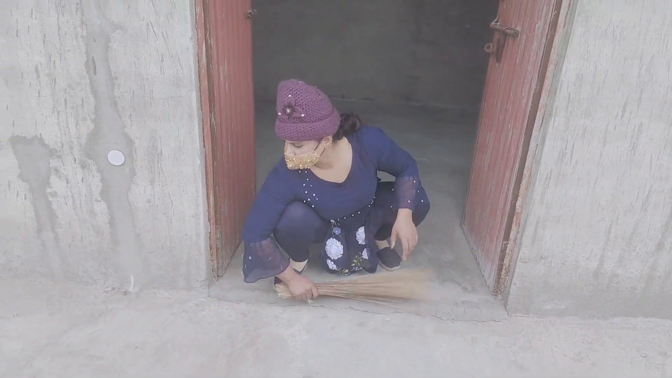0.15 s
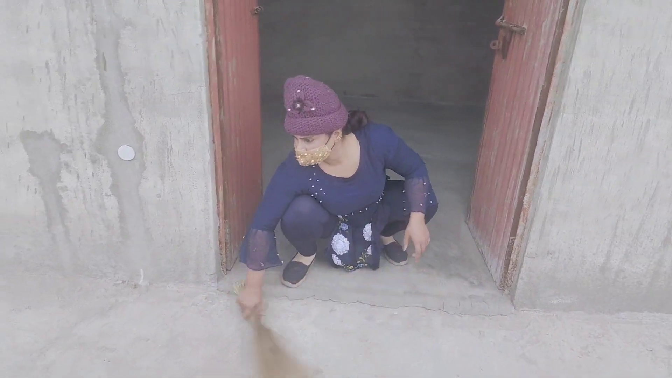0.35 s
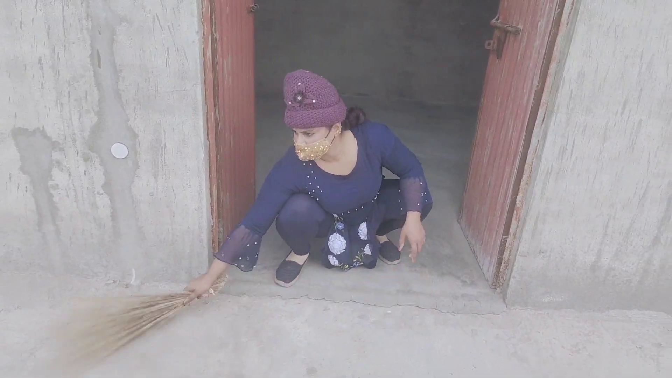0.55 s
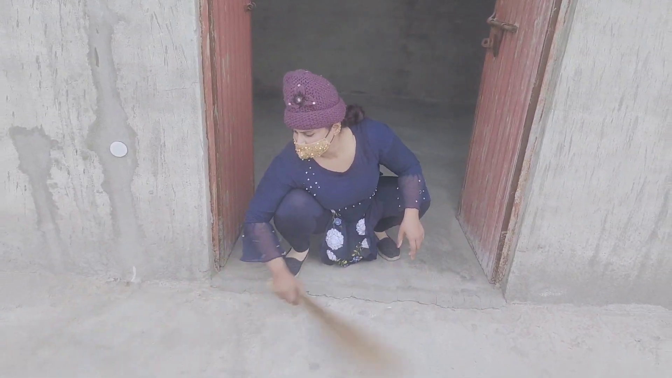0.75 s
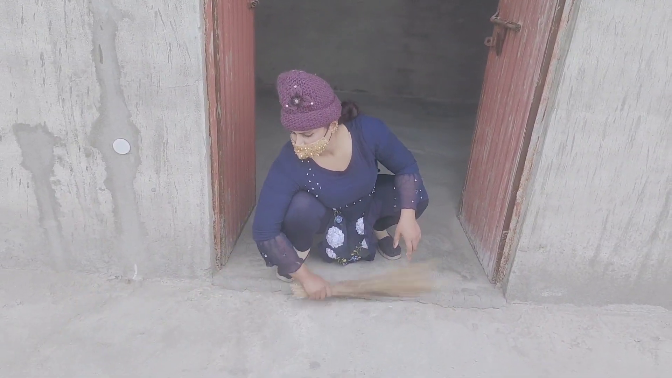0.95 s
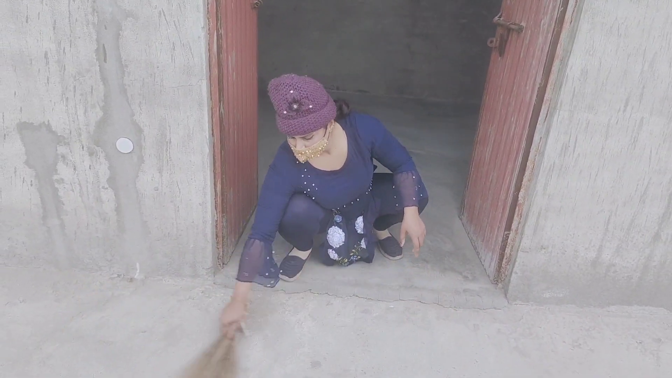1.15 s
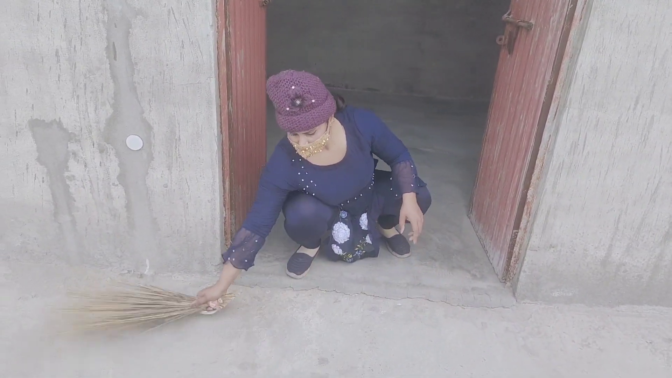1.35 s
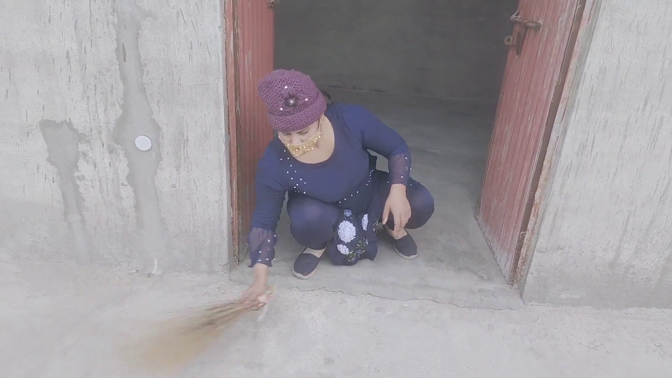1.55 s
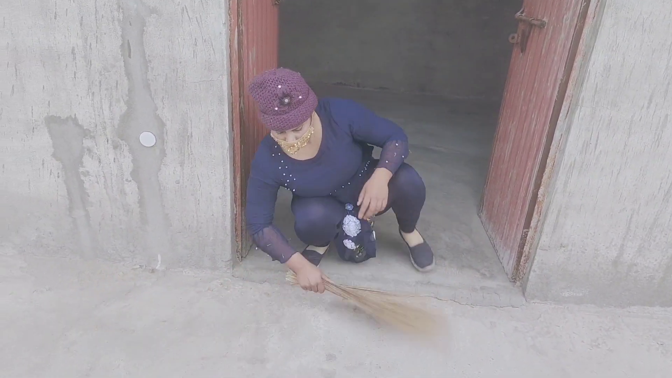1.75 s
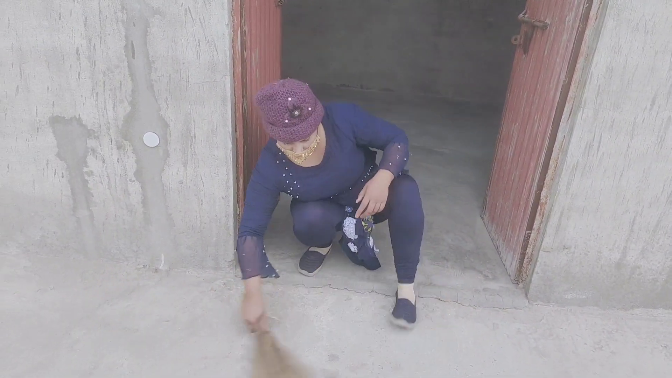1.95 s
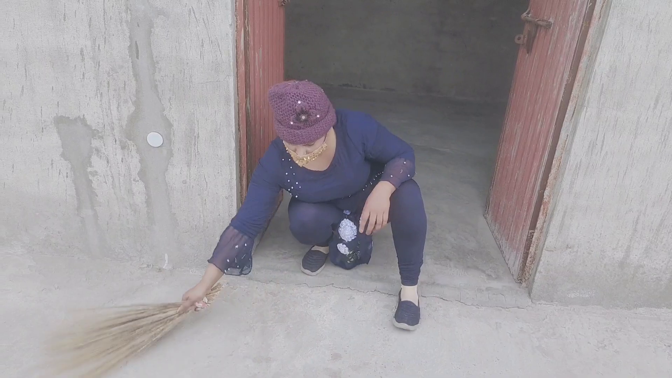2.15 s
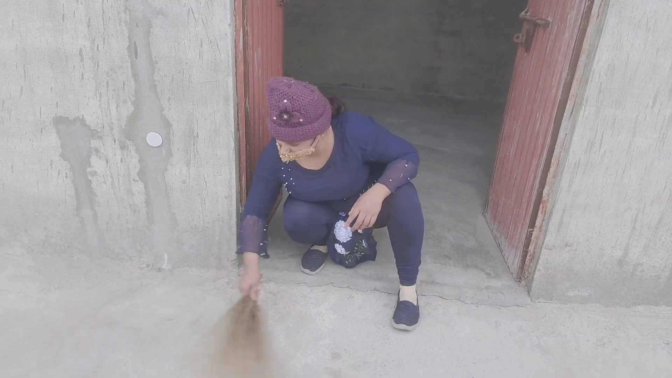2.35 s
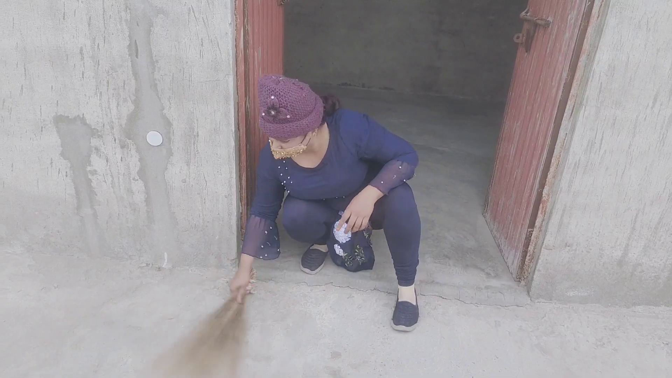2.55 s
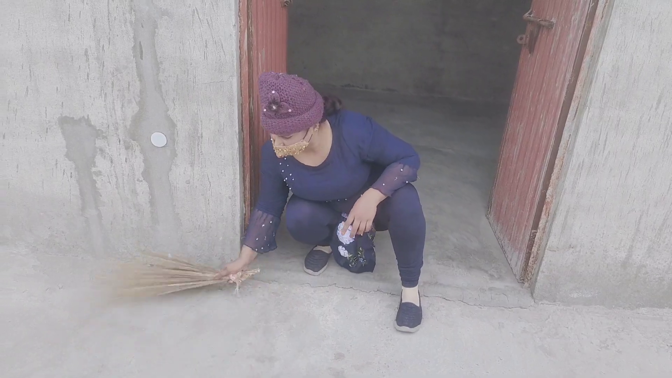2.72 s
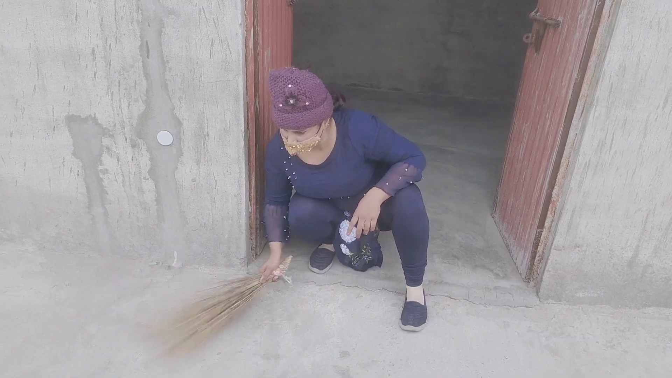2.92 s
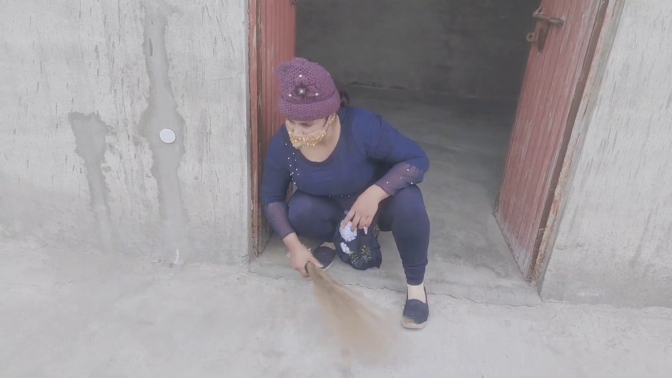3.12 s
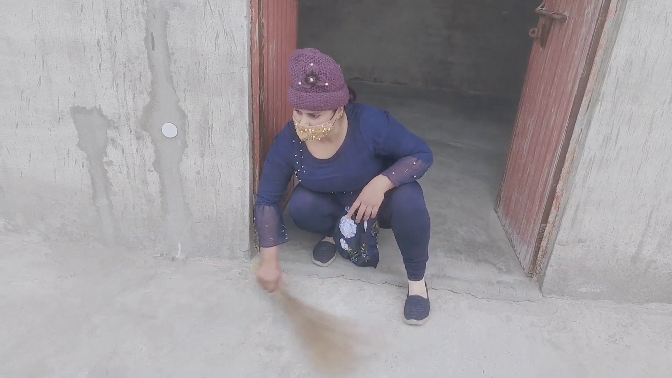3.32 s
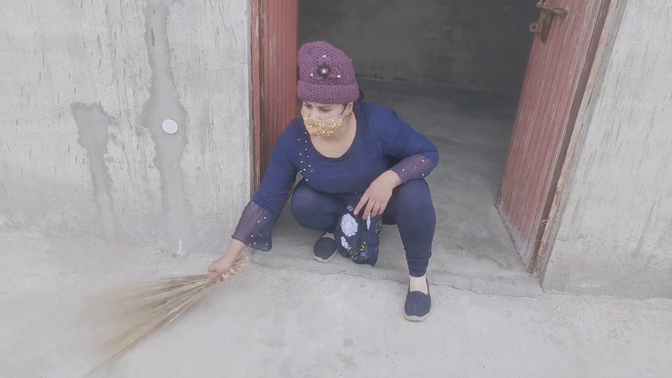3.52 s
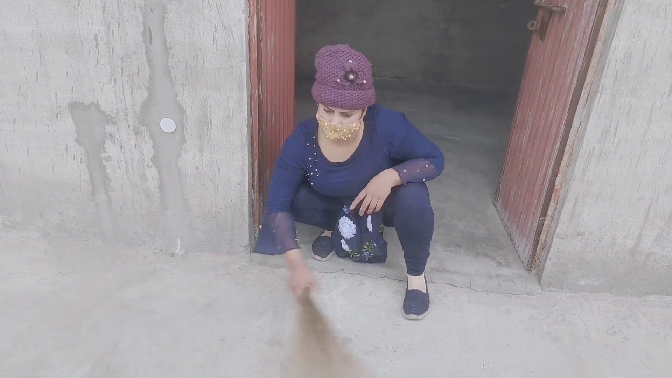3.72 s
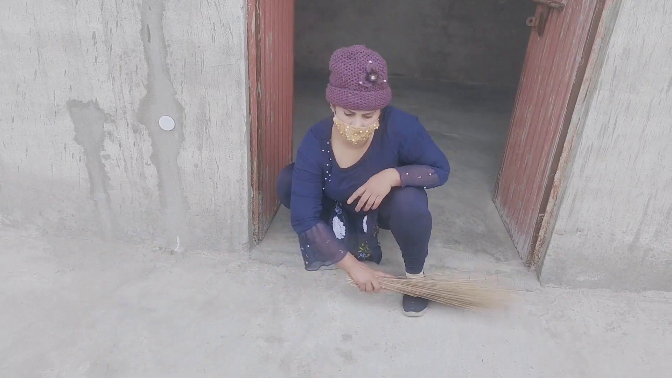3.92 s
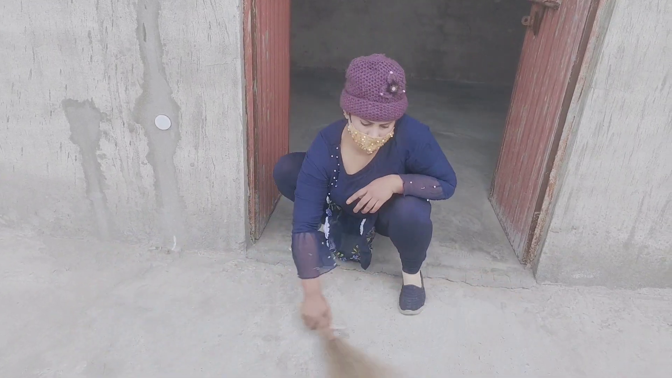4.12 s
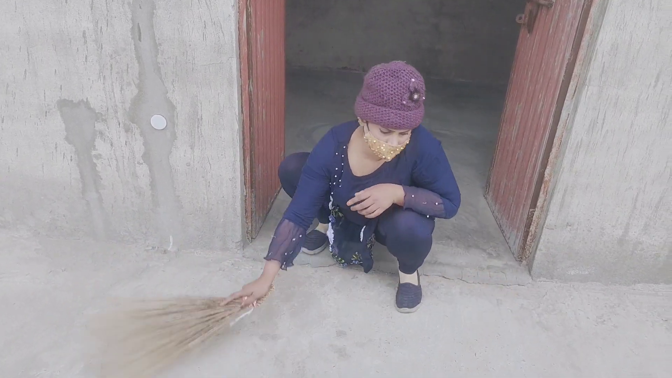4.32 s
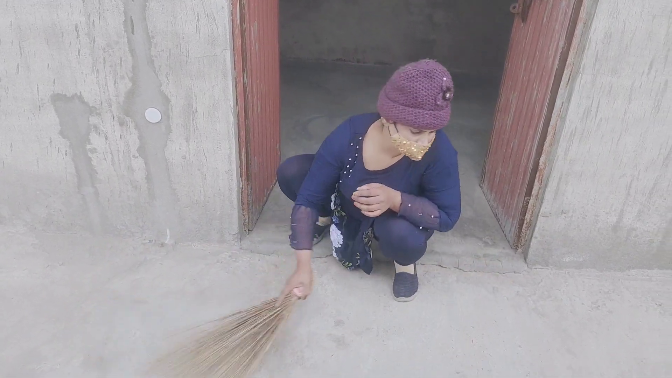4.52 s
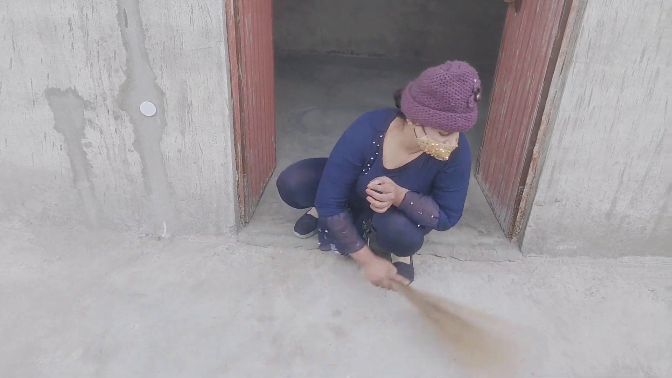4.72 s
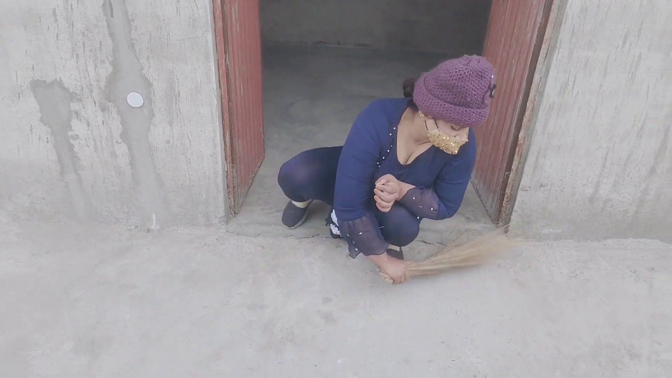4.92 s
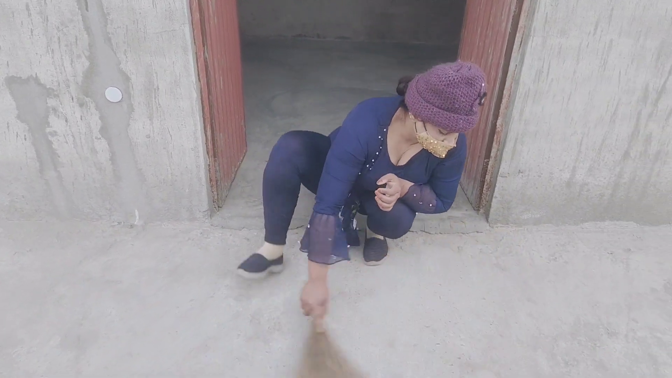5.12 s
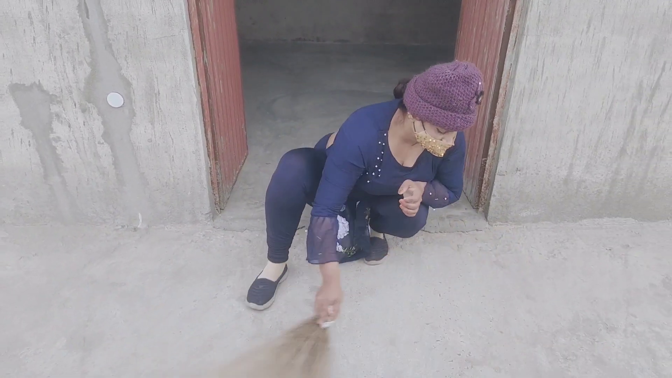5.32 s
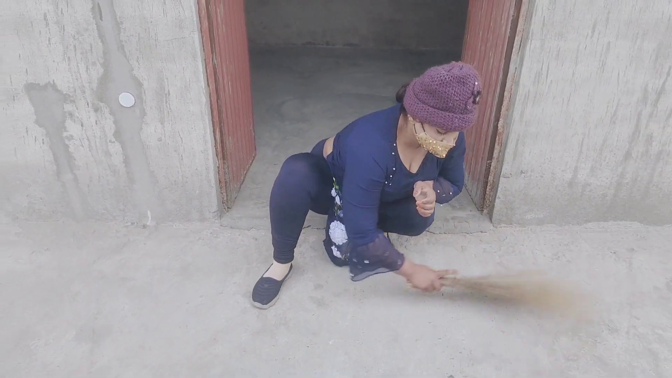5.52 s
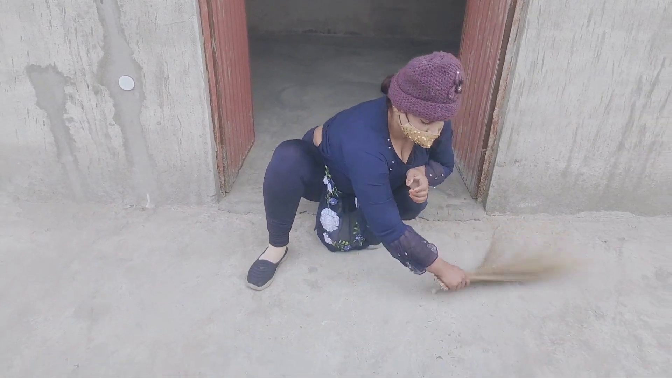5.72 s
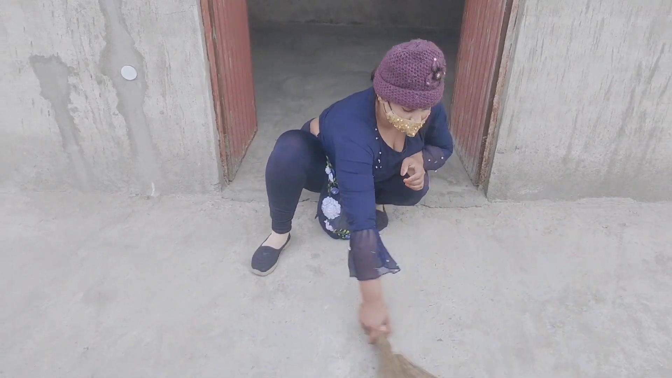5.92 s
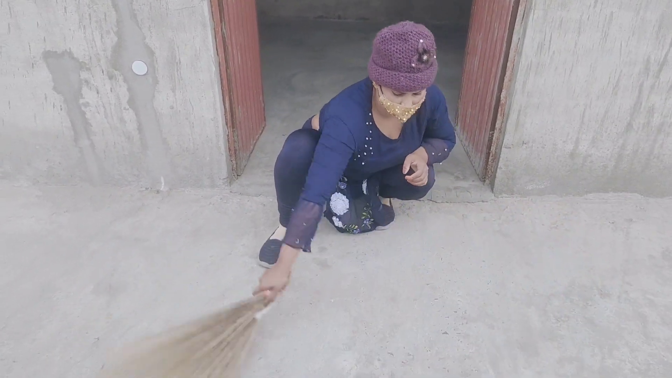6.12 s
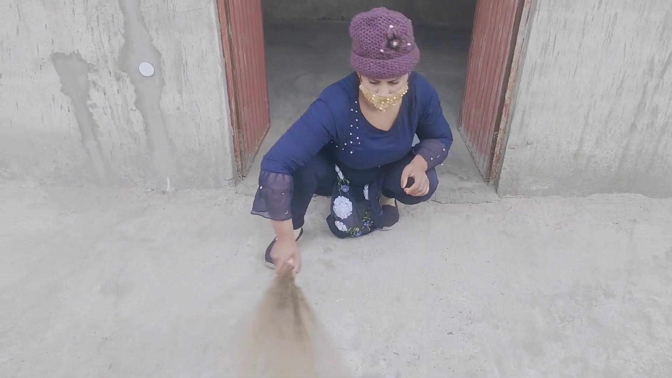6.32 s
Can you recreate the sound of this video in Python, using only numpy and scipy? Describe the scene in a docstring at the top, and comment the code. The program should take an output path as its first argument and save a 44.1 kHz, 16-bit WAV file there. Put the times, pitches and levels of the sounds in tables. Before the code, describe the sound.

Close to a pair of microphones, a stiff stalk broom sweeps concrete in eight bright, grainy swishes. Each lands lightly, drags, scrapes quickly towards the right and lifts. Pressed stalks clatter faintly. Three crisp taps fall between strokes, with occasional soft low bumps. Yard walls and a bare room behind give a short, hissy wash over quiet low rumble.

```python
"""A low outdoor rumble runs throughout; the faint end of a drag lifts off, then a broom sweeps concrete in eight swishes.
In each, the tips touch down, drag lightly, scrape across towards the right and lift; in most, pressed stalks clatter.
The broom is tapped three times between swishes; soft low bumps come now and then until shortly after the last tap.
A faint distant tone comes twice early on and again at the end. Catching tips are random clicks that ring the stalks.
Yard walls and the room behind an open doorway answer as noise that follows the power of the broom."""
import sys
import numpy as np
from scipy import signal
from scipy.fft import rfft, irfft, next_fast_len
from scipy.io import wavfile
from scipy.ndimage import uniform_filter1d, map_coordinates

SR = 44100
rng = np.random.default_rng(int(sys.argv[2]) if len(sys.argv) > 2 else 0)


def to_wav(sig):
    """Store sig (one row per channel, or 1-D mono) as 16-bit WAV at the path in sys.argv[1].

    Samples outside -1..1 are clipped; the rate is SR.
    """
    pcm = np.clip(np.atleast_2d(sig), -1, 1) * 32767
    pcm = np.round(pcm).astype(np.int16)
    wavfile.write(sys.argv[1], SR, pcm.T)  # frames by channels


N = 284886

# outdoor rumble, spectrum: f/Hz, density/dB per Hz (relative)
RUMBLE_SPECTRUM = [(22, -37), (45, -26), (90, -3), (130, -0.5), (240, -6.5), (350, -5), (550, -9),
                   (720, -8), (1000, -14), (1600, -19), (1800, -15), (2050, -21), (6000, -27),
                   (15600, -28.5)]
# diffuse sound: f/Hz, left-right likeness/1
LIKENESS = [(40, 0.68), (130, 0.92), (300, 0.92), (600, 0.0058), (1200, 0.054), (2500, 0.16), (8000, 0.015)]
# distant tone: t/s, length/s, nominal level/dB, f/Hz
DISTANT_TONES = [(0.197, .75, -66, 730), (1.25, .65, -68, 722), (6.25, .3, -62.5, 766)]
# soft low bumps: t/s, nominal level/dB, f/Hz, left-right before the microphones/dB
BUMPS = [(0.081, -45.5, 109, -25), (1.151, -38.5, 100, -19), (4.171, -46, 122, -22),
         (4.246, -35.5, 122, -11), (4.522, -38, 98, -12), (4.596, -40.5, 114, -22.5), (4.74, -40, 90, -17)]
# reverberation of the room: f/Hz, t60/s
ROOM_T60 = [(300, 0.12), (1200, 0.69), (1850, 0.83), (2300, 0.65), (3300, 0.63), (5500, 0.53),
            (10000, 0.44), (15000, 0.4)]
# colour of the two microphones: f/Hz, left-right/dB
MIC_BALANCE = [(40, -3), (130, -2), (280, 0), (600, -1), (1200, -3.5), (2200, 1), (8000, -0.5),
               (13000, 1.3)]
# bundle pressed flat, dry sound: t/s, level/dB, f/Hz, Gaussian length (sigma)/s
PRESSES = [(0.313, -40, 1170, 0.0096), (0.345, -51, 279, 0.039), (1.058, -46.5, 1070, 0.03),
           (1.06, -53.5, 298, 0.034), (1.986, -42.5, 584, 0.014), (2.004, -48.5, 277, 0.055),
           (2.672, -46.5, 1130, 0.014), (2.9, -50.5, 280, 0.017), (3.413, -55.5, 305, 0.051),
           (5.163, -51.5, 312, 0.053), (5.917, -56, 348, 0.096)]
# broom taps, dry sound: t/s, nominal level/dB
TAPS = [(1.454, -17.5), (2.9003, -17), (4.5, -21)]
# strokes, dry sound: touch t/s, contact length/s, drag level/dB, wait before push/s, push length/s, push level/dB,
# rise/s, fall/s, tip hiss re scrape/dB, stalk rub re scrape/dB, starting lag of the left microphone/ms
SWEEPS = [(-.45, 0.55, -61, .1, .2, -28, .02, 0.022, -1.5, -14, .05),
          (0.1667, .42, -48, 0.12, 0.27, -30.5, 0.011, 0.047, 2, -13.5, 0.047),
          (0.878, 0.47, -49, .19, 0.22, -28.5, 0.031, 0.053, 1.5, -15.5, 0.031),
          (1.824, 0.4, -60.5, 0.12, 0.2, -28, 0.031, 0.059, 3, -14.5, 0.049),
          (2.456, 0.31, -53, 0.078, 0.17, -30, .014, 0.0098, 1.5, -18, 0.08),
          (3.254, 0.47, -52, 0.1, 0.15, -29.5, 0.015, 0.021, 2.5, -17.5, 0.067),
          (3.956, 0.42, -51.5, 0.14, 0.21, -32, 0.019, 0.02, 1.5, -14.5, -0.013),
          (4.8898, 0.48, -52.5, 0.15, 0.19, -29.5, 0.025, 0.025, 1.6, -14.5, -0.065),
          (5.6387, .7, -54, .15, 0.36, -33.5, .029, 0.02, 1.5, -13.5, -0.11)]
# broom spectrum: f/Hz, density/dB per Hz (relative)
BROOM_SPECTRUM = [(240, -37), (400, -25), (481, -27), (716, -21), (1540, -16), (1880, -6), (2160, -8),
                  (2640, -2), (2930, -4.5), (3470, -1.5), (5850, -4.5), (7030, -2), (8450, -3.5),
                  (12800, 1.5), (15600, -1.5)]
# resonances of the bundle: f/Hz, width/Hz, level/dB
STALK_MODES = [(1975, 58, 5), (2430, 260, -3), (5120, 1400, -14), (7160, 1300, -9.5), (9700, 2300, -7),
               (12900, 650, -25)]

RUMBLE_DB, TONE_FADE_S, TOP_HZ = -54, 0.1, 15700
LAND_S, LIFT_S = 0.004, 0.048  # the tips land fast, leave gradually
TIPS_SPEED_DB = 2.5  # added to the tip hiss at speed 1
DRAG_RUB_DB = -13  # stalk rub re scrape in a light drag
TAP_TIPS_DB, TAP_RUB_DB = 5, -12.5  # re scrape
CROWN_DB = 0.24  # push speed: minus this at both ends, plus this at mid-arc
END_LAG_MS = 0.094  # every push ends on the right


def amp(db):
    """Decibels to gain."""
    return 10 ** (np.asarray(db) / 20)


def unit(x):
    """Scale to rms 1."""
    return x / np.sqrt(np.mean(x ** 2) + 1e-20)


def clock():
    """Time of each sample in s."""
    return np.arange(N) / SR


def along(points, hz):
    """(Hz, value) points joined on a log frequency axis."""
    f, v = np.transpose(points)
    return np.interp(np.log(hz + 1), np.log(f + 1), v)


def ramp(t, length_s):
    """From 0 at t = 0 to 1 after length_s."""
    return np.clip(t / length_s, 0, 1)


def ease(t, length_s):
    """Smooth step from 0 to 1 around t = 0."""
    return 0.5 + 0.5 * np.tanh(0.5 * t / length_s)


def wobble(rate_hz):
    """Smooth random curve, rate_hz knots a second."""
    knots = rng.standard_normal(int(N * rate_hz / SR) + 4)
    return map_coordinates(knots, [np.arange(N) * rate_hz / SR])


def filtered(x, response):
    """Apply a response given as a function of frequency."""
    m = next_fast_len(N + 8192)
    return irfft(rfft(x, m) * response(np.fft.rfftfreq(m, 1 / SR)), m)[..., :N]


def resonance(f, hz, width_hz):
    """Response of one damped mode."""
    return 1j * f * width_hz / (hz * hz - f * f + 1j * f * width_hz)


def below(f, edge_hz, order=8):
    """Low-pass weight, one half at the edge."""
    return 1 / (1 + (f / edge_hz) ** order)


def late(x, ms):
    """Delay by a time that may move."""
    return map_coordinates(x, [np.arange(N) - ms * SR / 1000], order=3)


def half_turn(f):
    """Angle mixing two independent noises into a pair of the tabulated likeness."""
    return np.arccos(np.clip(along(LIKENESS, f), -1, 1)) / 2


def outdoors():
    """Low rumble: shaped noise, alike on both sides in the bass, its level wandering slightly."""
    def mid_side(f):
        return amp(along(RUMBLE_SPECTRUM, f)) * [np.cos(half_turn(f)), np.sin(half_turn(f))]

    mid, side = filtered(rng.standard_normal((2, N)), mid_side)
    return unit(np.array([mid + side, mid - side])) * amp(RUMBLE_DB + 0.44 * wobble(3.8))


def distant_tones():
    """A distant tone, smeared into a narrow band by its many paths."""
    t, out = clock(), np.zeros(N)
    for s, length_s, db, hz in DISTANT_TONES:
        phase = 2 * np.pi * hz * t
        tone = unit(wobble(45) * np.sin(phase) + wobble(45) * np.cos(phase))
        fade = ramp(t - s, TONE_FADE_S) * ramp(s + length_s - t, TONE_FADE_S)
        out += amp(db - 1) * fade * tone
    return out


def bumps():
    """Short dull thuds: decaying low sines with a soft onset."""
    out = np.zeros((2, N))
    for s, db, hz, pan_db in BUMPS:
        t = np.maximum(clock() - s, 0)
        decay = amp(db - 1.0 - 60 * t / 0.07)
        onset = 1 - np.exp(-(t / 0.0074) ** 2)
        thud = decay * np.sin(2 * np.pi * hz * t) * onset
        out += thud * amp([[pan_db / 2], [-pan_db / 2]])
    return out


def echoes(x, yard_db, yard_t60_s, room_db, room_delay_s):
    """Diffuse wash whose power follows the broom: quick from the yard, slow from the room."""
    hz, t, z = signal.stft(x, SR, nperseg=256)
    t = t[t < 1]
    yard = amp(-60 * t / yard_t60_s) * (1 - np.exp(-t / 0.0013))
    room = amp(-60 * t / along(ROOM_T60, hz)[:, None]) * (1 - np.exp(-(t / room_delay_s) ** 2))
    decay_power = ((amp(yard_db) * unit(yard)) ** 2 + (amp(room_db) * unit(room)) ** 2) / len(t)
    power = abs(signal.fftconvolve(abs(z) ** 2, decay_power, axes=1)[:, :z.shape[1]])
    noise = signal.stft(rng.standard_normal((2, N)), nperseg=256)[2]
    # long waves reach both microphones alike
    turn = half_turn(hz)[:, None]
    wash = np.cos(turn) * noise[0] + np.sin(turn) * np.array([noise[1], -noise[1]])
    return signal.istft(wash / np.std(wash) * np.sqrt(power), nperseg=256)[1][:, :N]


def swing():
    """Left microphone lag in ms: each push carries the broom across, then it moves to the next start."""
    turns = []
    for s, _, _, wait_s, push_s, *_, start_lag_ms in SWEEPS:
        turns += [(s + wait_s, start_lag_ms), (s + wait_s + push_s, END_LAG_MS)]
    t, lag_ms = np.transpose(turns)
    return np.interp(clock(), t, lag_ms)


def microphones(x):
    """The moving broom reaches two microphones, directly and off the house wall."""
    lag_ms = swing()
    # the left one also gets a slightly later second path
    left = late(x, lag_ms / 2) + 0.56 * late(x, lag_ms / 2 + 0.239)
    right = 1.38 * late(x, -lag_ms / 2)
    detour_ms = 5.2 - 9 * lag_ms + 0.333 * wobble(3)
    wall = np.array([late(x, detour_ms), late(x, detour_ms + 0.266 - lag_ms)])
    return np.array([left, right]) + amp(-4.5) * wall


def catches(rate_hz, spread_db):
    """Stalk tips catch on grains of the concrete: random clicks, normalised for their rate."""
    chance = np.clip(rate_hz / SR, 0.001, 1)
    sizes = unit(rng.standard_normal(N) * amp(spread_db * rng.standard_normal(N)))
    return sizes * (rng.random(N) < chance) / np.sqrt(chance)


def presses():
    """Bent stalks rattle briefly against the floor and each other: clicks through a resonance."""
    clicks, out = catches(1500, spread_db=-2.5), np.zeros(N)
    for s, db, hz, length_s in PRESSES:
        rattle = unit(filtered(clicks, lambda f: resonance(f, hz, 0.36 * hz) ** 2))
        out += amp(db) * np.exp(-0.5 * ((clock() - s) / length_s) ** 2) * rattle
    return out


def contact():
    """Gains of scrape, tip hiss and stalk rub: a faster broom is louder and its tips hiss more."""
    t, gains = clock(), np.zeros((3, N))
    for s, length_s, drag_db, wait_s, push_s, push_db, rise_s, fall_s, tips_db, rub_db, _ in SWEEPS:
        touching = ramp(t - s, LAND_S) * ramp(s + length_s - t, LIFT_S)
        start = s + wait_s
        crown = amp(-CROWN_DB * np.cos(2 * np.pi * ramp(t - start, push_s)))
        speed = crown * ease(t - start, rise_s) * ease(start + push_s - t, fall_s)
        scrape = amp(drag_db) + amp(push_db) * speed
        tips = scrape * amp(tips_db + TIPS_SPEED_DB * speed)
        rub = amp(drag_db + DRAG_RUB_DB) + amp(push_db + rub_db) * speed
        gains += touching * np.array([scrape, tips, rub])
    for s, db in TAPS:
        # the stalks land one after another and spring back; a few rustle on
        after = np.maximum(t - s - 0.015, 0)
        rise = amp(1450 * np.minimum(t - s - 0.001, 0))
        landing = rise * (amp(-1000 * after) + amp(-24.5 - 73 * after))
        gains += landing * amp(db - 13.5) * amp([[0], [TAP_TIPS_DB], [TAP_RUB_DB]])
    return gains


def patchy(x, depth_db):
    """Moving colour: neighbouring bands of the scrape swell and fade at random."""
    z = signal.stft(x, nperseg=512)[2]
    field = rng.standard_normal(z.shape)
    for _ in range(2):
        field = uniform_filter1d(field, size=5, axis=0)
        field = uniform_filter1d(field, size=14, axis=1)
    return unit(signal.istft(z * amp(depth_db * unit(field)), nperseg=512)[1][:N])


def broom():
    """Dense catches ring the stalks; a harder stroke makes more of them."""
    scrape, tips, rub = contact()
    rate_hz = 12000 + 14000 * np.sqrt(scrape / scrape.max())
    clicks = patchy(catches(rate_hz, spread_db=1.5), depth_db=0.82)

    def colour(f):
        modes = sum(amp(db) * abs(resonance(f, hz, width_hz)) ** 2 for hz, width_hz, db in STALK_MODES)
        return amp(along(BROOM_SPECTRUM, f)) * (1 + modes)

    def band(share):
        return unit(filtered(clicks, lambda f: colour(f) * share(f)))

    middle = band(lambda f: below(f, edge_hz=8870) - below(f, edge_hz=2324))
    sound = scrape * middle * amp(0.85 * wobble(45))
    sound += tips * band(lambda f: 1 - below(f, edge_hz=9150)) * amp(0.37 * wobble(45))
    sound += rub * band(lambda f: below(f, edge_hz=1712)) * amp(-1 + 2.5 * wobble(45))
    # the bundle chatters over the uneven floor
    return sound * amp(0.47 * wobble(90))


def scene():
    """Broom with the answers of yard and room, over bumps, rumble and distant tone."""
    dry = broom() + presses()
    wet = echoes(dry, yard_db=-2.0, yard_t60_s=0.16, room_db=-7.0, room_delay_s=0.01)
    swept = (amp(-7.0) * microphones(dry) + wet) * amp([[0.5], [-0.5]])
    return swept + bumps() + outdoors() + distant_tones()


def record(dry):
    """The two microphones differ a little in colour; nothing passes above the band limit."""
    def response(f):
        return amp(along(MIC_BALANCE, f) * np.array([[0.5], [-0.5]])) * (f < TOP_HZ)

    return filtered(dry, response)


dry = scene()
out = record(dry)
to_wav(out)
```